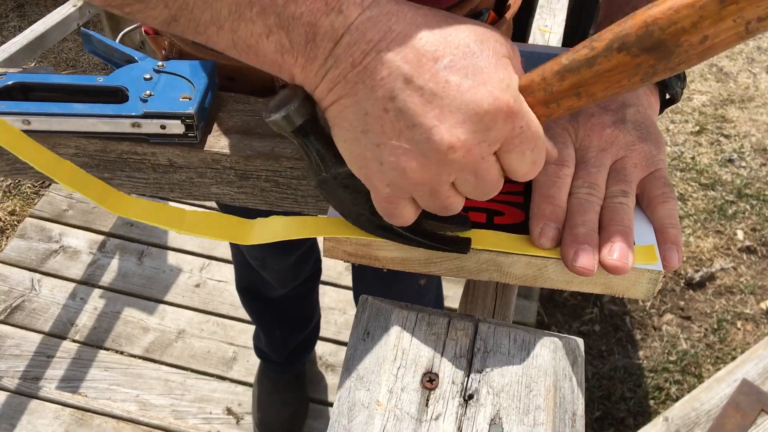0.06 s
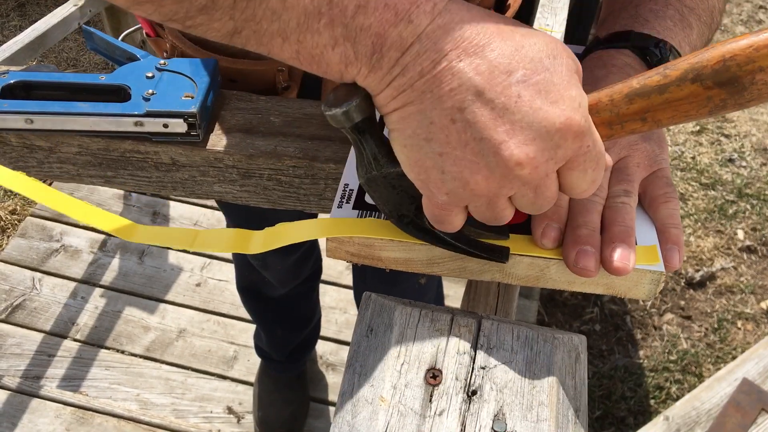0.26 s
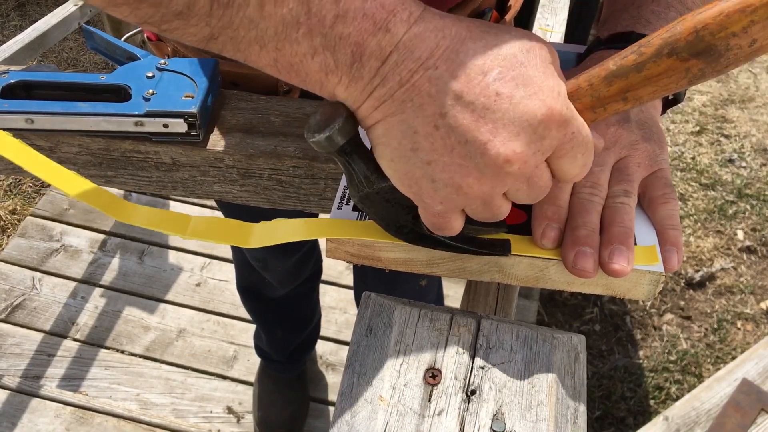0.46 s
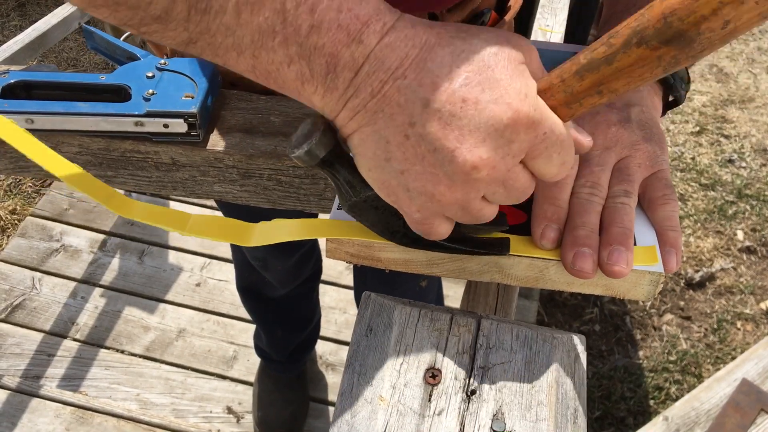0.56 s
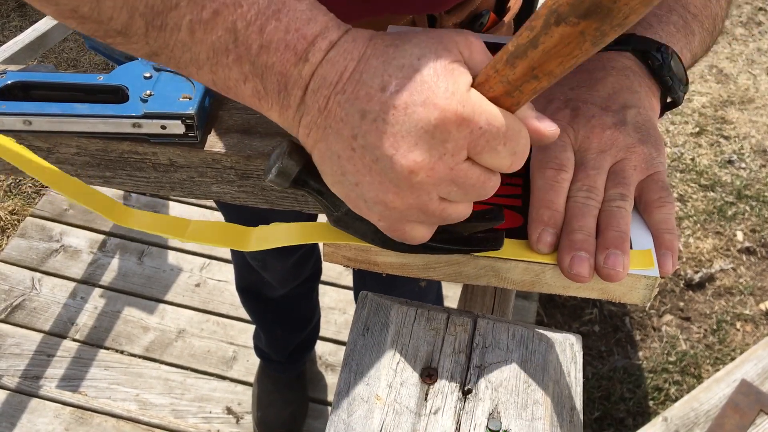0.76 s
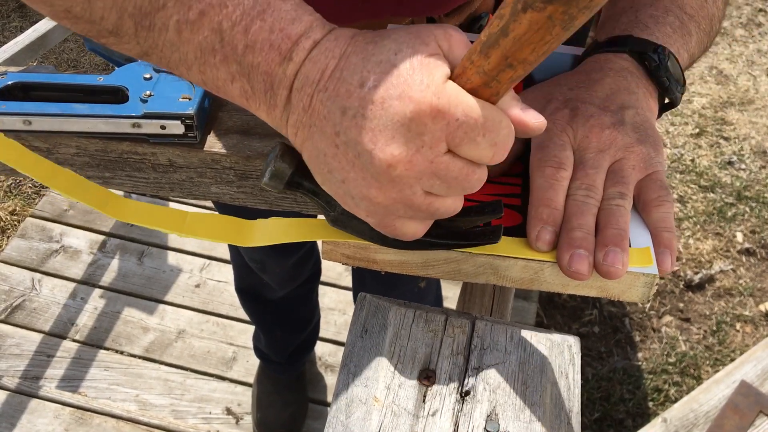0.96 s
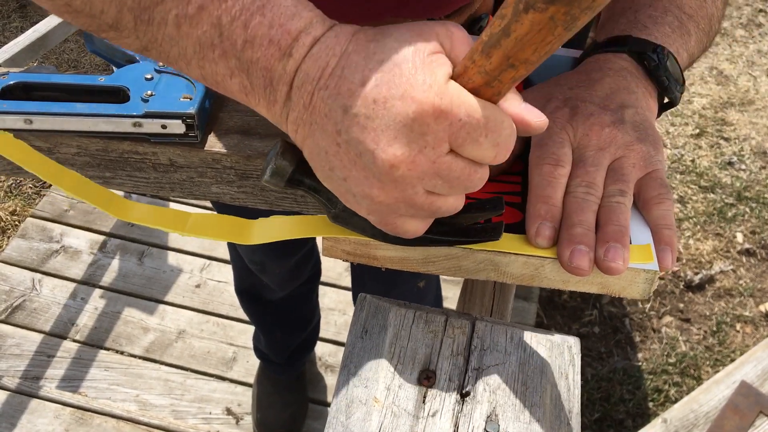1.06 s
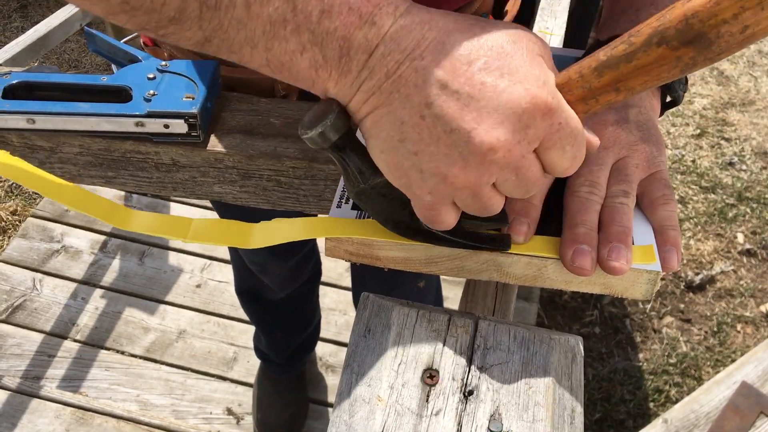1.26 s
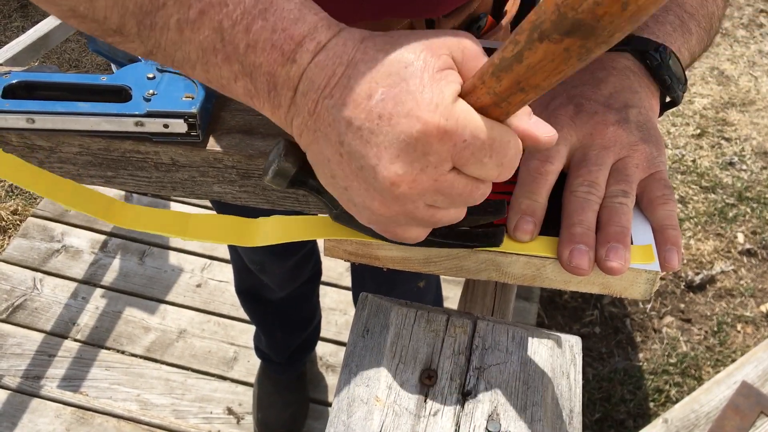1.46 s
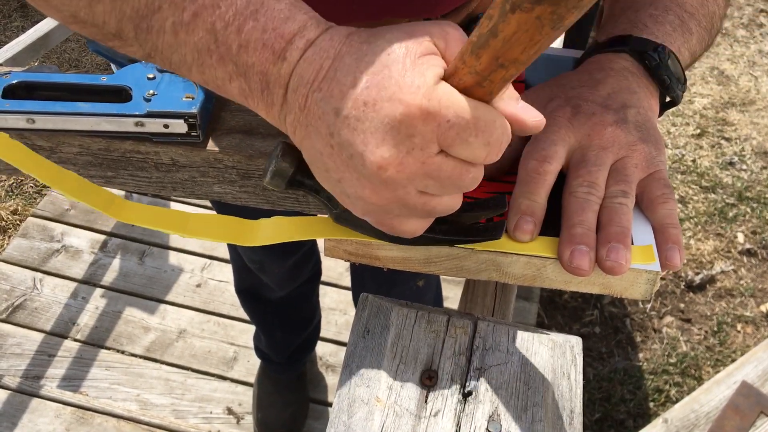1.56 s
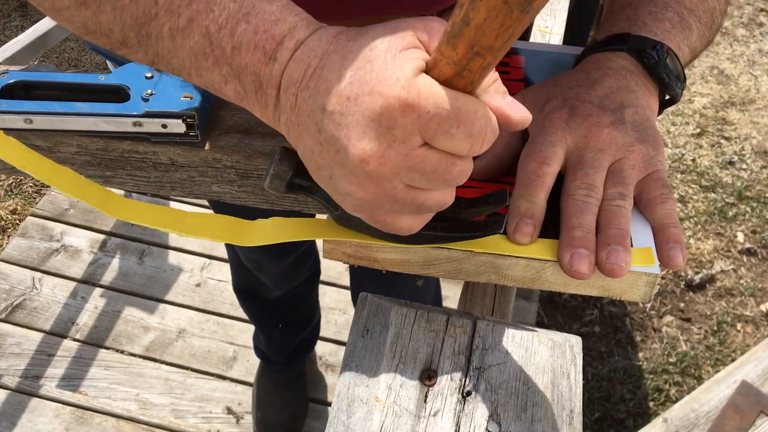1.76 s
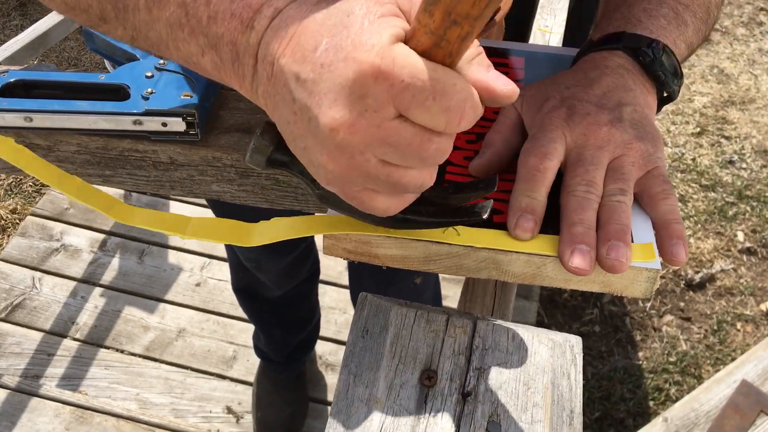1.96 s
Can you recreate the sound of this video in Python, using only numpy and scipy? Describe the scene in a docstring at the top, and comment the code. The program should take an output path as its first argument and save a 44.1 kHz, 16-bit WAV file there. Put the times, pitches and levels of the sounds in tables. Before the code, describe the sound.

Sharp click of a staple levered out of wood by a hammer claw, after small scrapes outdoors

```python
"""On an outdoor deck, a claw hammer levers a staple out of a wooden stake, close to the microphone.
The claw scrapes into place: uneven tiny impulses sound as grit and make wood and steel ring.
Low tones make dull bumps and wind buffets.
The staple slips with a faint click, then snaps free: bursts of noise with the ring of steel, stake and deck.
Behind it lie a low distant hum and soft outdoor noise, built from wavering tones and bands of noise."""
import sys
import numpy as np
from scipy import signal
from scipy.fft import rfft, irfft
from scipy.io import wavfile
from scipy.ndimage import uniform_filter1d

SR = 44100
rng = np.random.default_rng(int(sys.argv[2]) if len(sys.argv) > 2 else 0)


def master_out(mix):
    """Clip the mix to full scale and print it as 16-bit PCM to the path in sys.argv[1]."""
    frames = np.transpose(np.atleast_2d(mix))
    ceiling = np.clip(frames, -1, 1)
    pcm = np.round(ceiling * 32767).astype(np.int16)
    wavfile.write(sys.argv[1], SR, pcm)


N = 88420
T = np.arange(N) / SR  # time in seconds
FREQS = np.fft.rfftfreq(N, 1 / SR) + 1  # in Hz; the added 1 avoids log(0)
STAKE_LAG_S, STEEL_LAG_S = 0.0026, 0.001  # travel time of a bending wave at 1 kHz
RADIATE_FROM_HZ = 556  # the ringing bodies give off little sound below this


def amp(db):
    """Turn decibels into a gain."""
    return 10 ** (np.asarray(db) / 20)


def unit(x):
    """Scale a sound to an effective (rms) level of 1."""
    return x / (np.std(x) + 1e-12)


def decay(t60):
    """Fade that falls by 60 dB in t60 seconds."""
    return np.exp(-np.log(1000) * T / t60)


def colour(x, points):
    """Shape the spectrum by points of (Hz, dB), then scale to level 1."""
    hz, db = np.array(points).T
    gain = amp(np.interp(np.log(FREQS), np.log(hz), db))
    return unit(irfft(rfft(x) * gain, N))


def band(hz, octaves):
    """Noise that is full at hz and fades smoothly to nothing some octaves to each side."""
    away = np.log2(FREQS / hz) / octaves
    gain = np.cos(np.clip(away, -1, 1) * np.pi / 2)
    return irfft(rfft(rng.standard_normal(N)) * gain, N)


def walk(rate):
    """Slow random motion with spread 1: random steps, rate per second, smoothed twice."""
    k = int(SR / rate)
    steps = rng.standard_normal(N)[np.arange(N) // k]
    return unit(uniform_filter1d(uniform_filter1d(steps, k), k))


def ring(modes, lag_s):
    """Response of a body to a tap: fading tones; low bending waves arrive later and radiate weakly."""
    tones = sum(amp(db) * np.sin(2 * np.pi * hz * T) * decay(t60) for hz, db, t60 in modes)
    f = np.fft.rfftfreq(2 * N, 1 / SR) + 1
    # this phase delays each frequency by lag_s * sqrt(1000 / f)
    travel = np.exp(-4j * np.pi * lag_s * np.sqrt(1000 * f))
    radiation = 1 / np.sqrt(1 + (RADIATE_FROM_HZ / f) ** 14)
    return irfft(rfft(tones, 2 * N) * travel * radiation)[:N]


def drive(force, body):
    """Shake a body with a force: every push starts its own ring (convolution)."""
    return signal.fftconvolve(force, body)[:N]


def at(x, s):
    """Delay a sound to its start time."""
    return np.concatenate([np.zeros(int(s * SR)), x])[:N]


def outdoor_air():
    """Outdoor noise from bands a third of an octave apart, each flickering gently in level."""
    # Spectrum of the noise. Each row: frequency in Hz, relative level in dB per Hz.
    air_points = [(15, -40), (25, -14), (76, -2.5), (123, -10), (157, 0), (175, -9.5), (190, -12.5),
                  (242, -5.5), (354, -23.5), (775, -16), (887, -16.5), (1130, -20.5), (1370, -32),
                  (1790, -24.5), (3160, -42), (12200, -54), (16000, -58)]
    # Slow changes of the treble. Each row: time in seconds, level change in dB.
    treble_points = [(0, 9), (.2, 2.5), (.45, 3), (.7, -2), (1.05, -1.5), (1.2, 0), (1.35, 0.5), (1.62, 0),
                     (1.8, -2.5), (2, 5)]
    level_db, flicker_db, treble_hz = -45.5, 0.5, 1400
    hz, db = np.array(air_points).T
    treble = np.interp(T, *np.array(treble_points).T)
    air = 0
    for f in 32 * 2 ** (np.arange(28) / 3):
        band_db = np.interp(np.log(f), np.log(hz), db)
        band_db = band_db + flicker_db * walk(7.95)
        band_db = band_db + treble * f / (f + treble_hz)  # high bands follow the treble most
        air = air + band(f, octaves=1 / 3) * amp(band_db)
    return amp(level_db) * unit(air)


def distant_hum():
    """Low steady tones whose strength and phase waver at random."""
    # Tones of the hum. Each row: frequency in Hz, level in dB, depth of waver as a share of the tone.
    hum_tones = [(161.3, -53.5, 0.39), (235, -52, 0.15)]
    hum = 0
    for hz, db, waver in hum_tones:
        wobble = 1 + waver * (walk(13.7) + 1j * walk(13.97))
        tone = np.real(wobble * np.exp(2j * np.pi * hz * T))
        hum = hum + amp(db) * unit(tone)
    return hum


def faint_hiss():
    """Faint coloured noise that fades in once the staple is out."""
    start_s, fade_s, level_db = 1.72, 0.03, -65.5
    hiss = colour(rng.standard_normal(N), [(1000, -1), (4000, 2), (9000, -3.5), (16000, -9)])
    return amp(level_db) * hiss * np.clip((T - start_s) / fade_s, 0, 1)


def stake_ring():
    """Ring of the wooden stake after one tap, with the claw bearing on it."""
    # Tones of the stake. Each row: frequency in Hz, relative level in dB, time to fall 60 dB in seconds.
    stake_modes = [(695, -21, .055), (858, -20, .03), (1025, -15, .038), (1243, -19.5, .055),
                   (1462, -11.5, .022), (1694, -22, .038), (1918, -21, .034), (2182, -17, .042),
                   (2428, -25, .055), (2602, -11, .014), (2815, -18, .027), (3280, -18, .018),
                   (3600, -21, .024), (4110, -8, .01)]
    return ring(stake_modes, STAKE_LAG_S)


def grains():
    """Dense, uneven impulses as two rubbing surfaces stick and slip."""
    grains_per_s, spread_db = 3000, 3
    hits = rng.random(N) < grains_per_s / SR
    signs = rng.choice([-1, 1], N)
    return unit(hits * signs * amp(spread_db * rng.standard_normal(N)))


def claw(stake):
    """Stick-slip force of the claw under the staple: gritty, jerky scrapes and small ticks."""
    # Scrapes. Each row: start, attack, hold and release in seconds, then grit, stake and claw level in dB.
    scrapes = [(-.01, 0.026, .02, 0.059, -58, -59, -67), (0.038, 0.015, 0.013, 0.053, -64.5, -56, -47),
               (.272, .033, 0.041, 0.011, -47, -56, -58), (0.304, 0.0075, 0.0099, .036, -52, -36.5, -59.5),
               (1.194, 0.037, 0.035, .04, -61.5, -79, -78)]
    # Small ticks under load. Each row: start in seconds, grit level in dB, stake level in dB.
    ticks = [(0.099, -50, -69), (0.129, -62, -72), (0.3358, -57, -55), (0.3502, -47, -45.5),
             (0.365, -49, -56), (.4995, -60, -83), (.8115, -59, -72), (1.183, -58, -51),
             (1.525, -59.5, -65), (1.544, -50, -47.5), (1.675, -56, -65)]
    # Spectrum of the grit. Each row: frequency in Hz, relative level in dB.
    grit_points = [(300, 15.5), (1000, 2), (3000, -2), (5000, -13), (7000, 0), (9000, 3), (10200, -16.5),
                   (12000, 0.5), (16000, -8)]
    # Force of the claw dragging on wood. Each row: frequency in Hz, relative level in dB.
    drag_points = [(100, -18), (350, 5.5), (600, -5.5), (850, -3.5), (1050, 4.5), (1450, 0), (2000, -10),
                   (3000, -10.5), (5000, -27)]
    # Force of a soft tick. Each row: frequency in Hz, relative level in dB.
    tick_points = [(300, -2), (1000, 0), (2000, 1), (3000, 1), (4000, -7.5), (6000, -15)]
    # Tones of the sliding claw. Each row: frequency in Hz, relative level in dB, time to fall 60 dB in seconds.
    claw_modes = [(2230, -2.5, 0.0094), (2620, -3.5, 0.04), (3180, -1.5, 0.011), (3730, -3.5, 0.029),
                  (4600, -6, 0.024), (5110, -6, 0.017), (5610, 1, 0.011), (6230, 1.5, 0.0071)]
    jerk_db, jerks_per_s = 2.5, 400  # the drag catches and lets go
    rasp_db = -4.5  # rasp straight from the contact, against the ring of the stake
    tick_decay_s = 0.0046  # time for the grit of a tick to fall to about a third

    force = grains() * amp(jerk_db * walk(jerks_per_s))
    grit = colour(force, grit_points)
    drag = colour(force, drag_points)
    wood = unit(unit(drive(drag, stake)) + amp(rasp_db) * drag)
    knock = unit(drive(colour(force, tick_points), stake))
    metal = unit(drive(force, ring(claw_modes, STEEL_LAG_S)))
    out = 0
    for s, attack, hold, release, grit_db, stake_db, claw_db in scrapes:
        corners = s + np.cumsum([0, attack, hold, release])
        press = np.interp(T, corners, [0, 1, 1, 0]) ** 1.43
        out = out + press * (amp(grit_db) * grit + amp(stake_db) * wood + amp(claw_db) * metal)
    for s, grit_db, stake_db in ticks:
        fade = at(np.exp(-T / tick_decay_s), s)
        # the square root lets the wood fade half as fast as the grit
        out = out + amp(grit_db) * grit * fade + amp(stake_db) * knock * np.sqrt(fade)
    return out


def low_thumps():
    """Low tones that swell and die quickly: dull bumps of the stake, and soft wind buffets."""
    # The rows at 0.854 and 1.947 s are the wind buffets.
    # Each row: start in seconds, frequency in Hz, level in dB, time to swell to full in seconds.
    thump_rows = [(.32, 54.4, -40, 0.014), (0.336, 213, -32, 0.0046), (.372, 150.8, -30, 0.011),
                  (0.854, 57.5, -33, 0.0076), (1.53, 55, -38, .014), (1.555, 148, -34.5, 0.0062),
                  (1.724, 180, -31, 0.0037), (1.947, 69, -38, 0.012)]
    out = 0
    for s, hz, db, swell in thump_rows:
        envelope = T / swell * np.exp(1 - T / swell)
        out = out + at(amp(db) * envelope * np.sin(2 * np.pi * hz * T), s)
    return out


def deck():
    """Sound of a click scattered among the boards: noise bands that build up, then fade."""
    # Each row: frequency in Hz, relative level in dB per Hz, time to fall 60 dB in seconds.
    deck_points = [(148, -22, 0.19), (350, -32, 0.13), (613, 9, 0.11), (1200, -4.5, 0.16),
                   (2440, -1.5, 0.13), (4140, -4, 0.12), (7100, -9, .07), (11000, -14.5, 0.09),
                   (16000, -18, 0.08)]
    build_s = 0.0063
    hz, db, t60 = np.array(deck_points).T
    out = 0
    for f in 125 * 2 ** (np.arange(15) / 2):  # bands half an octave apart
        band_db = np.interp(np.log(f), np.log(hz), db)
        band_t60 = np.interp(np.log(f), np.log(hz), t60)
        out = out + band(f, 0.46) * amp(band_db) * decay(band_t60)
    return 2 * out * (1 - np.exp(-T / build_s))


def staple(stake):
    """The staple gives way: each slip is a burst of friction with the ring of steel, stake and deck."""
    # Each row: start, length of slip and release time in seconds, then crack, staple, stake and deck gain in dB.
    clicks = [(1.6363, 0.002, 0.00072, -21.5, -34.5, -24.5, -38.5),
              (1.6986, 0.00064, 0.0016, -10.5, -17.5, 0, -22.5)]
    # Spectrum of the crack. Each row: frequency in Hz, relative level in dB.
    crack_points = [(300, -31), (900, 4.5), (1800, -4), (2600, 2), (4500, 2), (5500, -2), (7800, -0.5),
                    (9500, -3), (11500, -1.5), (13500, -11), (14600, -18), (16000, -22)]
    # Tones of the staple. Each row: frequency in Hz, relative level in dB, time to fall 60 dB in seconds.
    steel_modes = [(4450, -10, 0.026), (5170, -4.5, 0.025), (5720, -10, .026), (6680, -4.5, 0.025),
                   (6940, -6.5, 0.021), (7320, -7, 0.012), (8330, -11, .012), (9400, 2.5, .008),
                   (11070, 2, .009), (12650, -14, 0.021), (13700, -14, 0.029)]
    steel = ring(steel_modes, STEEL_LAG_S)
    out = 0
    for s, slip_s, release_s, crack_db, steel_db, stake_db, deck_db in clicks:
        friction = np.tanh(colour(rng.standard_normal(N), crack_points))  # tanh rounds off the peaks
        crack = friction * np.exp(-np.maximum(T - slip_s, 0) / release_s)
        click = amp(crack_db) * crack + amp(steel_db) * steel
        click = click + amp(stake_db) * stake + amp(deck_db) * deck()
        out = out + at(click, s)
    return out


def scene():
    """Add all sources at one microphone."""
    background = outdoor_air() + distant_hum() + faint_hiss()
    stake = stake_ring()
    return (background + claw(stake) + low_thumps() + staple(stake))[None]


def record(dry):
    """The recorder caps the peaks, then cuts the top above 15.9 kHz."""
    low_pass = signal.ellip(10, 0.2, 90, 15900, fs=SR, output="sos")
    return signal.sosfilt(low_pass, np.clip(dry, -1, 1))


dry = scene()
out = record(dry)
master_out(out)
```